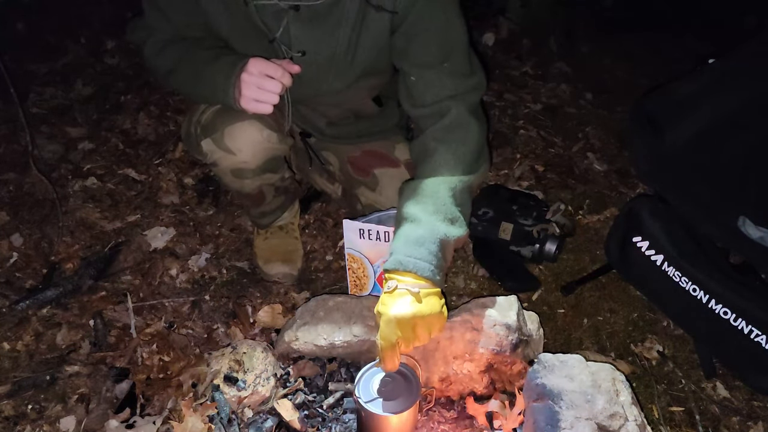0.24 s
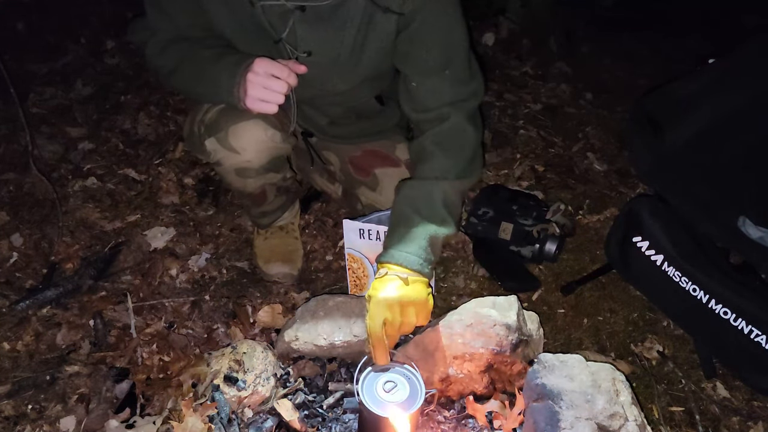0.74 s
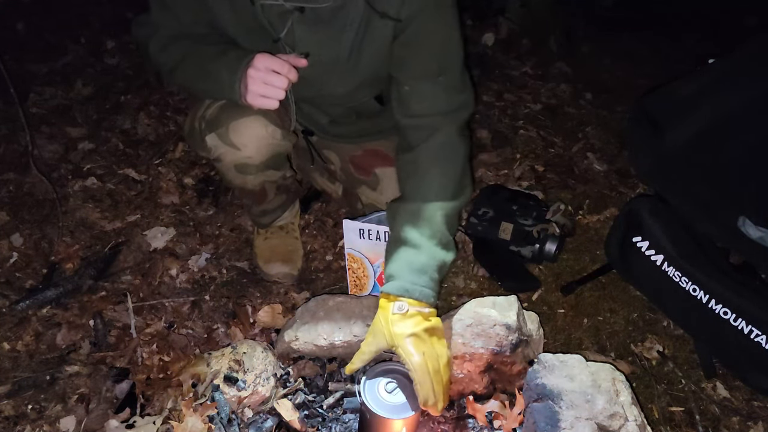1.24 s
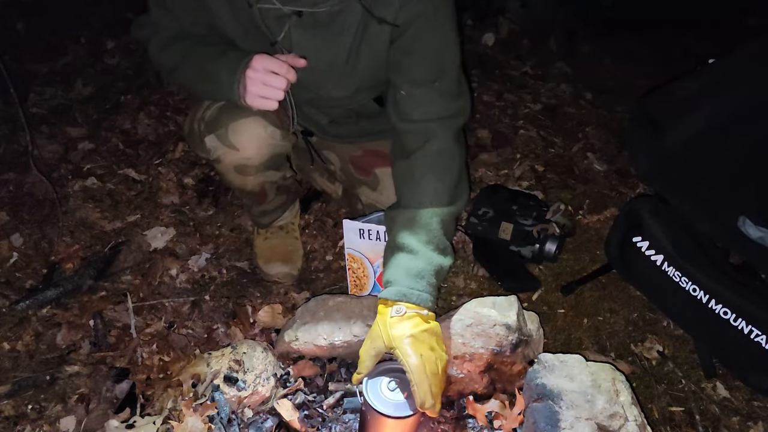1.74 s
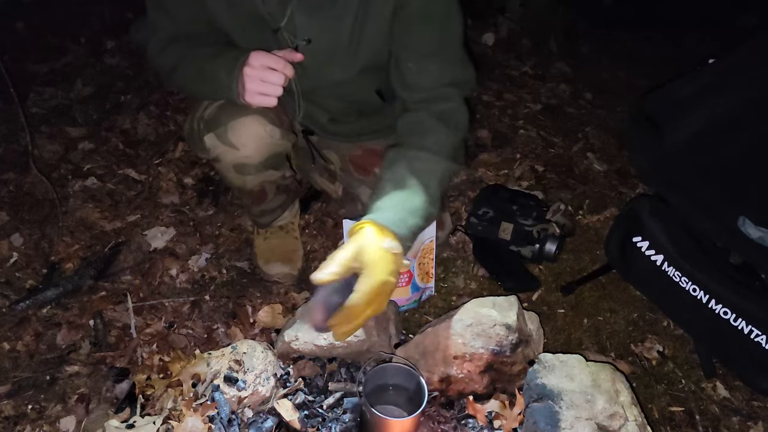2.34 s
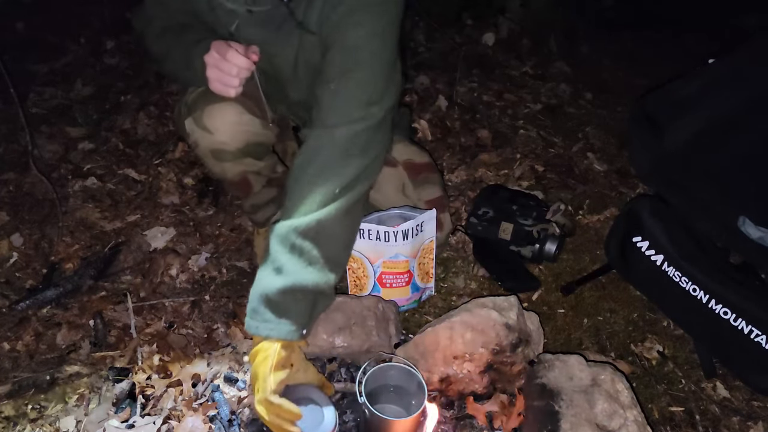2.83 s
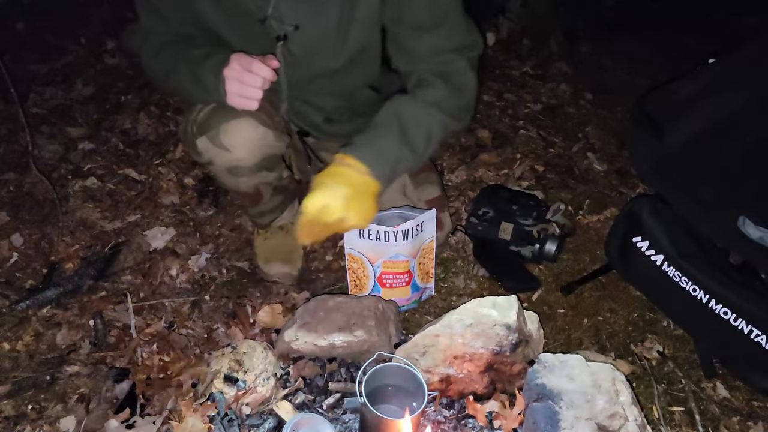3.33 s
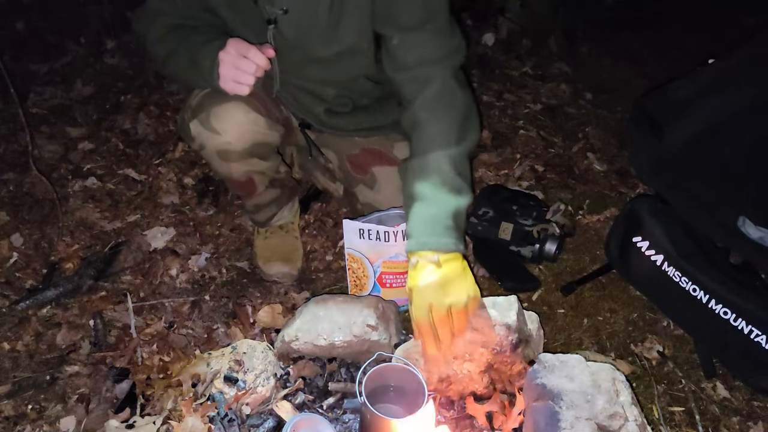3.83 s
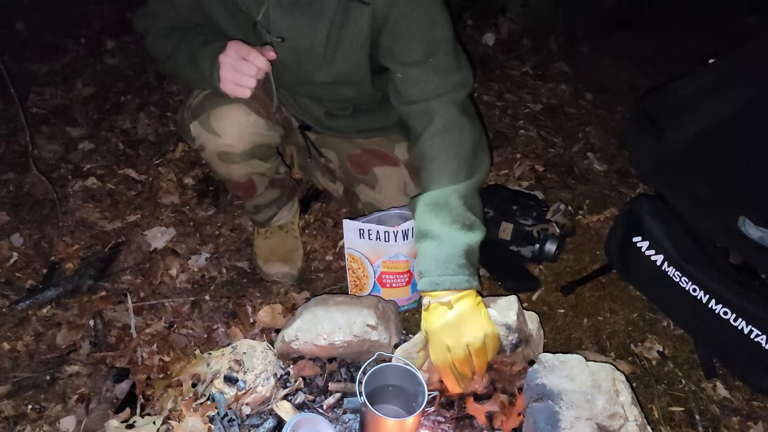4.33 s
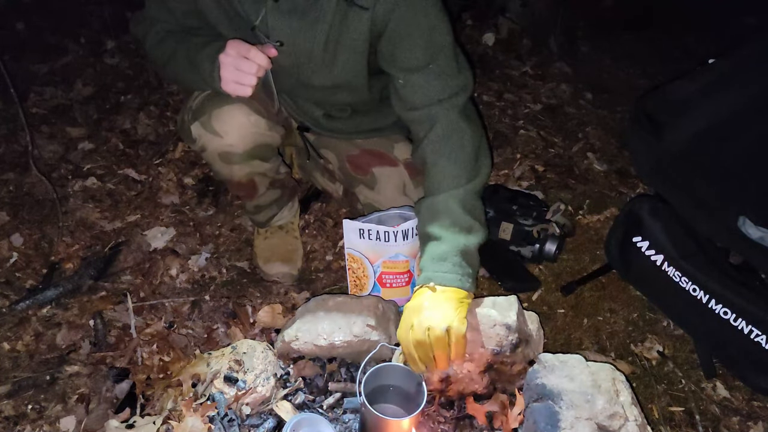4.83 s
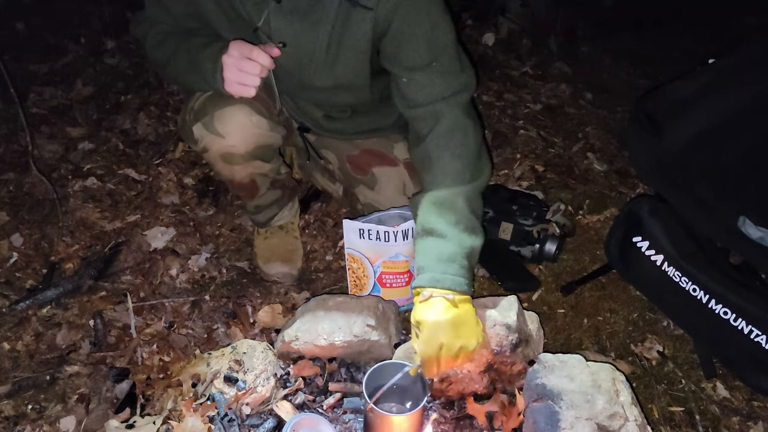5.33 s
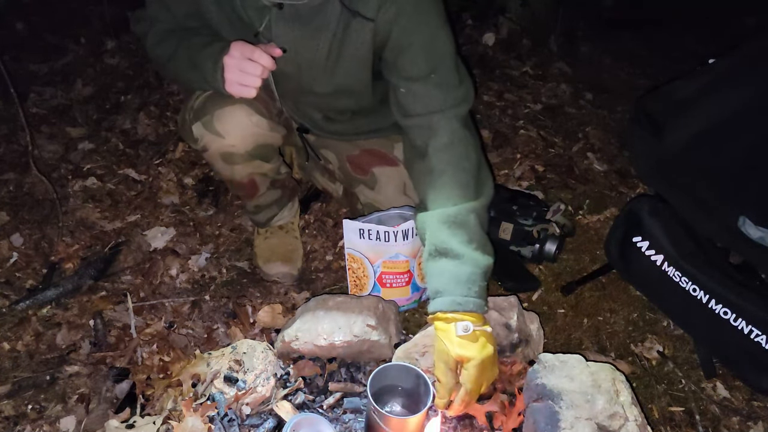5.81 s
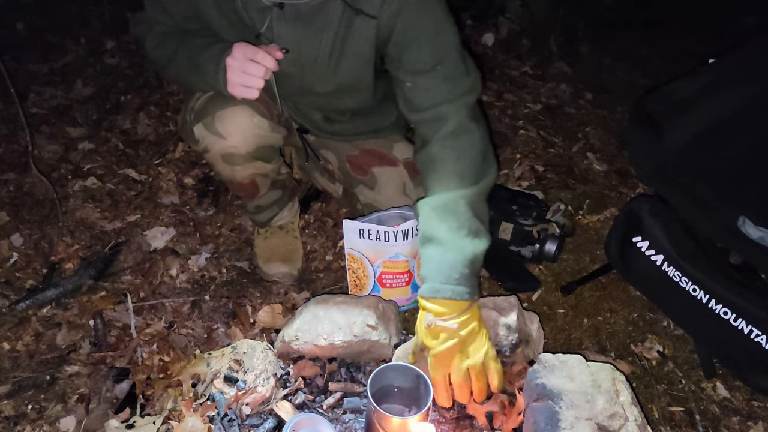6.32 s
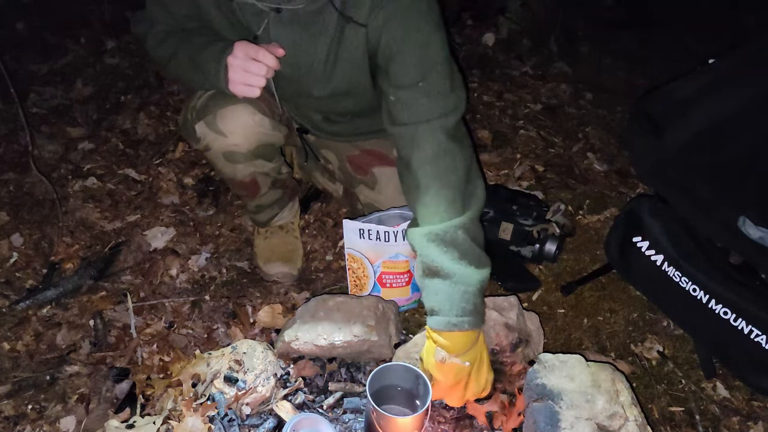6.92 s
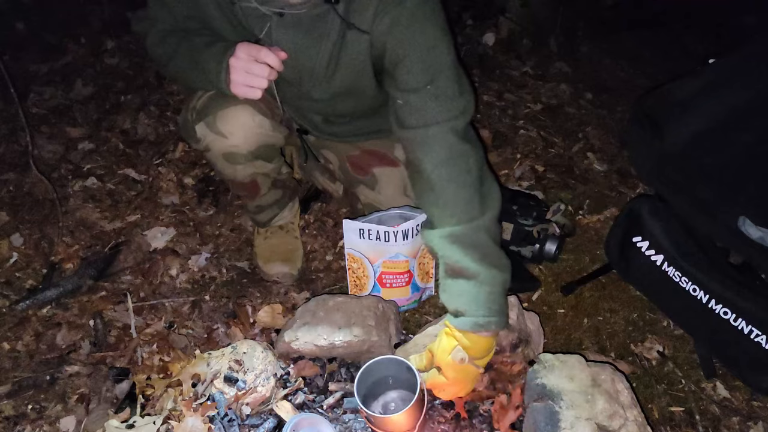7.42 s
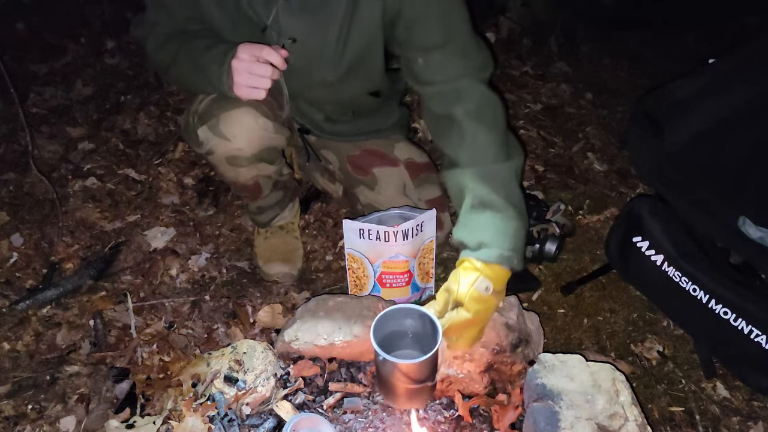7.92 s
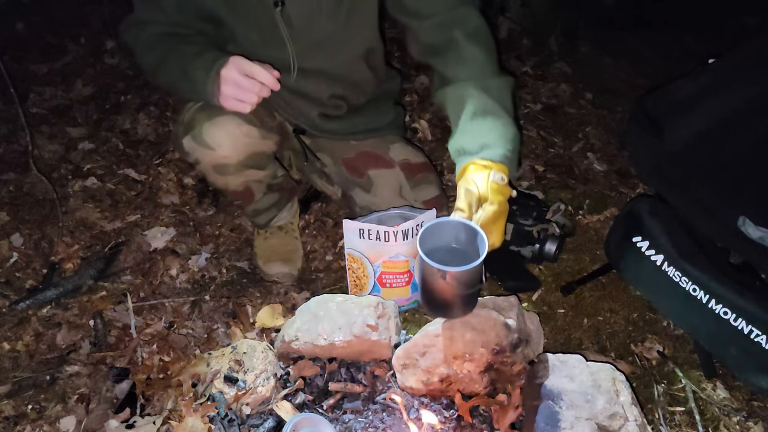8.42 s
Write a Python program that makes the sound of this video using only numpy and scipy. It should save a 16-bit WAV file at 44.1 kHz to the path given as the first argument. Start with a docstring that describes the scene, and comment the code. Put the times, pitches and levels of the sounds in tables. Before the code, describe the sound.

Close metallic knocks and scrapes, a short dry lid rattle on rock, then ringing wire-on-cup clinks beside a quiet, faintly snapping fire outdoors.

```python
"""Tin cup by the embers

A gloved hand works the lid off a thin metal cup at a small campfire and drops it on the stones.
The wire bail grinds in its lugs and clinks on the cup, then the glove lifts the cup away.
Blows drive damped modes, a dense wash and a shimmer; glove and bail rub by random stick and slip.
Embers snap in filtered noise bursts over a low rumble and faint hiss; trees return a noise-tail echo."""
import sys
import numpy as np
from scipy import signal
from scipy.fft import rfft, irfft
from scipy.io import wavfile

SR = 44100
rng = np.random.default_rng(int(sys.argv[2]) if len(sys.argv) > 2 else 0)


def to_wav(s):
    """Save 16-bit WAV."""
    ch = np.atleast_2d(s).T  # columns
    pcm = np.round(np.clip(ch, -1, 1) * 32767)  # PCM
    wavfile.write(sys.argv[1], SR, pcm.astype(np.int16))


N = 381906  # length [samples]
RING_TIME = np.arange(SR // 3) / SR  # the third of a second given to each blow [s]
CRACK_T60_S = .008  # 60 dB decay of the crack at a point of contact


def undb(db):
    """Decibels to gain."""
    return 10 ** (np.asarray(db) / 20)


def unit(x):
    """Scale to an energy of one, averaged over the channels."""
    return x / np.sqrt(np.mean(np.sum(x ** 2, axis=-1)) + 1e-20)


def fade(t60):
    """Exponential decay that falls 60 dB in t60 seconds."""
    return np.exp(-np.log(1000) * RING_TIME / t60)


def colour(x, points):
    """Causal, minimum-phase filter through (frequency [Hz], gain [dB]) points, by the cepstrum."""
    hz, db = np.transpose(points)
    size = 4096
    bin_hz = np.arange(size // 2 + 1) * SR / size
    log_gain = np.log(undb(np.interp(np.log(bin_hz + 1), np.log(hz), db)))
    # folding the cepstrum onto positive time makes the filter causal
    cepstrum = irfft(log_gain)[:size // 2]
    cepstrum[1:] *= 2
    impulse = irfft(np.exp(rfft(cepstrum, size)))
    return signal.fftconvolve(x, impulse[None], axes=-1)[:, :x.shape[-1]]


def stereo_noise(count, split_hz):
    """Noise nearly alike at both ears in the lows, widening until unrelated above split_hz."""
    mid, side = rfft(rng.standard_normal((2, count)))
    hz = np.fft.rfftfreq(count, 1 / SR)
    width = np.clip(hz / split_hz, .2, 1)
    spectra = np.array([mid + width * side, mid - width * side])
    return irfft(spectra / np.sqrt(1 + width ** 2), count)


def add(out, s, sound):
    """Mix a sound in at time s."""
    start = int(s * SR)
    out[:, start:start + sound.shape[1]] += sound[:, :N - start]


def random_slips(count, slips_per_s):
    """Sparse jerks of random size and sign at random instants."""
    return (rng.random(count) < slips_per_s / SR) * rng.standard_normal(count)


def slipping(slips_per_s, rough_db):
    """Stick and slip: tiny jerks of uneven size that come in spurts."""
    slips = random_slips(N, slips_per_s)
    # each 400-sample spurt has its own level
    spurt_db = rough_db * np.repeat(rng.uniform(-1, 1, N // 400 + 1), 400)[:N]
    return slips * undb(spurt_db)


def strokes(table):
    """Each stroke swells to its peak and dies away, by 20 dB over its rise and its fall time."""
    t = np.arange(N) / SR
    power = np.zeros(N)
    for s, db, rise_s, fall_s in table:
        away = np.maximum((s - t) / rise_s, (t - s) / fall_s)
        power += undb(db - 20 * np.minimum(away, 10)) ** 2
    return np.sqrt(power)


def contact(chatter_s, slips_per_s):
    """One sharp touch, then a dying run of tiny rebounds and slips."""
    slips = random_slips(len(RING_TIME), slips_per_s)
    force = 1.8 * unit(slips * np.exp(-2 * RING_TIME / chatter_s))
    force[0] += 1 / (1 + chatter_s / 0.022)  # long chatter softens the first touch
    return force


def ring(force, modes, split_hz):
    """Damped modes; the higher ones reach the two ears out of step."""
    mode_bend = .003  # grip and point of contact bend each pitch by up to this share
    out = 0
    for (hz, db, t60), (phase, skew, share, bend) in zip(modes, rng.uniform(-1, 1, (len(modes), 4))):
        bent_hz = hz * (1 + mode_bend * bend)
        pole = np.exp((2j * np.pi * bent_hz - np.log(1000) / t60) / SR)
        swing = signal.lfilter([1], [1, -pole], force)
        ear_skew = np.array([[1], [-1]]) * skew * min(hz / split_hz, 1.3)
        turn = np.exp(1j * (np.pi * phase + ear_skew))
        # each blow shifts the mode's level by up to 3.6 dB
        out = out + undb(db + 3.6 * share) * unit((turn * swing).imag)
    return unit(out)


def shimmer(t60, thinning):
    """The scattered partials that one contact point happens to wake; they crowd together in the treble."""
    count = len(RING_TIME)
    hz = np.fft.rfftfreq(count, 1 / SR)
    share = np.interp(hz, [2000, 9000], [.07, .14]) / thinning
    awake = (rng.random(len(share)) < share) / np.sqrt(share)
    return irfft(rfft(stereo_noise(count, 5600)) * awake, count) * fade(t60)


def blows(table, modes, wash, wash_t60, slips_per_s, split_hz, ring_db, shimmer_db, glance):
    """Each contact drives the clear modes, the dense, short wash of thin metal and a longer shimmer."""
    out = np.zeros((2, N))
    for s, db, chatter_s, bass_db, treble_db in table:
        free_db = -max(treble_db, 0) * glance  # a bright, glancing touch leaves less ring
        force = contact(chatter_s, slips_per_s)
        plate = unit(stereo_noise(len(force), split_hz) * (fade(wash_t60) + fade(CRACK_T60_S)))
        plate = plate + undb(shimmer_db + free_db) * unit(shimmer(t60=.22, thinning=2.5))
        struck = signal.fftconvolve(plate, force[None], axes=-1)[:, :len(force)]
        clash = unit(colour(struck, wash))
        sound = clash + undb(free_db + ring_db) * ring(force, modes, split_hz)
        # the place and hardness of the contact tip the balance of lows and highs
        sound = colour(sound, [(450, bass_db), (1300, 0.0022), (3000, treble_db / 4), (9000, treble_db)])
        # the first 20 ms set the level in each channel
        attack = np.sqrt(np.mean(sound[:, :SR // 50] ** 2, axis=1, keepdims=True))
        add(out, s, sound / attack * undb(db))
    return out


# rumble level before its trim: (time [s], level [dB])
RUMBLE_LEVEL = [(0.0, -48.5), (2.99, -49), (3.01, -46.5), (6.39, -51), (8.66, -47.5)]
# tone of the rumble: (frequency [Hz], gain [dB])
RUMBLE_COLOUR = [(12, -52.5), (20, -15.5), (80, -1), (113, -10), (178, -13), (198, -20.5), (354, -19.5),
                 (431, -24), (536, -23), (597, -29), (955, -32.5), (1500, -40.5), (1950, -70.5),
                 (3300, -120)]
# tone of the hiss: (frequency [Hz], gain [dB])
HISS_COLOUR = [(1000, -16.5), (2000, -2.5), (3500, -9), (5500, -6.5), (6500, 0), (7300, 10.5),
               (8300, -60.5), (10300, -4), (12000, -10.5), (15500, -2)]


def background():
    """A low outdoor rumble of drifting level under a faint hiss, both filtered noise."""
    rumble_trim_db, hiss_db = -0.5, -65.5
    rumble_db = rumble_trim_db + np.interp(np.arange(N) / SR, *np.transpose(RUMBLE_LEVEL))
    rumble = unit(colour(stereo_noise(N, 1000), RUMBLE_COLOUR + [(3500, -99.0)])) * undb(rumble_db)
    hiss = unit(colour(stereo_noise(N, 5000), HISS_COLOUR)) * undb(hiss_db)
    return (rumble + hiss) * np.sqrt(N)  # from unit energy to unit RMS


def trees(x, echo_db, t60):
    """Trunks and ground scatter back a thin tail that builds up over 14 ms."""
    tail = stereo_noise(len(RING_TIME), 3000) * fade(t60) * np.minimum(RING_TIME / 0.014, 1)
    tail = colour(tail, [(5500, -3.5), (7200, 7.0), (8500, -5.5), (15200, -12.0)])
    return undb(echo_db) * signal.fftconvolve(x, unit(tail), axes=-1)[:, :N]


# ember snaps: (time [s], level [dB], centre frequency [Hz])
EMBER_SNAPS = [(2.706, -54, 4970), (3.338, -54, 7250), (3.473, -56.5, 7070), (3.834, -63.5, 9800),
               (6.815, -63, 9200), (7.3987, -50.5, 10400), (7.433, -57.5, 10000), (7.5, -55.5, 7800),
               (7.73, -58.5, 12500)]


def embers():
    """Tiny dry snaps, each a noise burst with its own pitch."""
    out = np.zeros((2, N))
    for s, db, hz in EMBER_SNAPS:
        snap = stereo_noise(len(RING_TIME), 7000) * (fade(.012) + .1 * fade(.05))
        snap = colour(snap, [(hz / 4, -16), (hz / 1.8, -9), (hz, 0), (hz * 1.3, -10)])
        add(out, s, unit(snap) * np.sqrt(SR / 50) * undb(db))  # energy as of 20 ms at that level
    return out


# strokes of the glove and sleeve: (peak time [s], level [dB], rise [s], fall [s])
GLOVE_STROKES = [(.186, -33.5, 0.02, 0.033), (.348, -57, 0.0099, 0.047), (.44, -45, 0.048, 0.047),
                 (.80, -48, 0.23, 0.087), (1.44, -58.5, 0.038, 0.13), (1.55, -54.5, 0.055, 0.056),
                 (2.535, -57, 0.071, 0.056), (2.615, -55, 0.072, 0.31), (2.71, -59.5, 0.2, 0.95),
                 (3.19, -40.5, 0.17, 0.036), (6.58, -52.5, 0.038, 0.11), (7.10, -51, 0.048, 0.14),
                 (7.19, -54, 0.23, 0.15), (7.38, -59.5, 0.19, 0.36)]
# tone of leather and cloth rubbing: (frequency [Hz], gain [dB])
RUB_COLOUR = [(300, 1), (1200, 4), (1800, 0.5), (3100, 4), (5500, 7.5), (8500, 0), (15500, -7)]


def glove():
    """Leather and cloth rub on each other and on the metal: dense slips, each a short puff of rasp."""
    rasp_s, sleeve_db = .002, -72.5  # decay of one puff; cloth never quite rests
    slips = slipping(slips_per_s=2200, rough_db=3.5)
    power = signal.lfilter([1], [1, -np.exp(-1 / (rasp_s * SR))], slips ** 2)
    rasp = unit(colour(stereo_noise(N, 5000) * np.sqrt(power), RUB_COLOUR))
    return rasp * np.sqrt(N) * (strokes(GLOVE_STROKES) + undb(sleeve_db))


# turns of the wire bail in its lugs: (peak time [s], level [dB], rise [s], fall [s])
BAIL_TURNS = [(4.895, -50, 0.03, 0.097), (5.13, -47.5, 0.086, 0.13), (5.27, -29.5, 0.041, 0.1),
              (5.50, -51.5, .1, 0.24), (5.79, -38, 0.14, 0.072), (5.955, -39, .06, 0.15),
              (6.115, -43, 0.096, 0.056), (6.57, -56.5, 0.025, 0.11), (6.83, -56, .08, 0.053),
              (7.35, -50, 0.25, 0.15)]
# tone of the cup's wall as the wire grinds on it: (frequency [Hz], gain [dB])
GRIND_COLOUR = [(400, -21.5), (1050, -7.5), (2450, -6), (3300, -6.5), (5550, 0.5), (6200, -1.5),
                (7200, 8.5), (8400, -3.5), (13000, -6), (15200, 1)]
# ring of the open cup, for grinding and clinks: (frequency [Hz], level [dB], 60 dB decay [s])
CUP_MODES = [(975, -12, .2), (1055, -7, .16), (1330, -6, .22), (1750, -9, .12), (2272, 1, .15),
             (2640, -4, .11), (3860, -8, .12), (4165, -5, .13), (4628, -2, .11), (5040, -7, .15),
             (5480, -4, .14), (5650, 0, .11), (5880, -1, .13), (6207, -3, .09), (6410, -2, .12),
             (8538, -8, .07), (9082, -3, .08), (14293, -2, .07), (14750, 1, .07), (15596, -1, .07)]


def bail_grinding(count=4):
    """The wire catches and slips in its lugs and rings the cup's wall, differently at each point of contact."""
    slips = slipping(slips_per_s=600, rough_db=6)
    dwell = int(.03 * SR)  # 30 ms before the point of contact is drawn again
    place = np.repeat(rng.integers(count, size=N // dwell + 1), dwell)[:N]
    touch = signal.unit_impulse(len(RING_TIME))
    low_modes = [mode for mode in CUP_MODES if mode[0] < 6000]
    out = 0
    for k in range(count):
        grit = .7 * unit(stereo_noise(len(touch), 5000) * fade(CRACK_T60_S))
        wall = unit(shimmer(t60=.11, thinning=6)) + .5 * ring(touch, low_modes, 4000)
        local_slips = slips * (place == k)
        out = out + signal.oaconvolve(local_slips[None], grit + wall, axes=-1)[:, :N]
    return unit(colour(out, GRIND_COLOUR)) * np.sqrt(N) * strokes(BAIL_TURNS)


# clinks of the wire: (time [s], level [dB], chatter [s], bass [dB], treble [dB])
BAIL_CLINKS = [(4.7574, -53.5, .006, -17, -7.5), (4.9141, -43.5, 0.023, 33.5, 5),
               (5.1351, -45, 0.035, -45, 10), (5.2455, -15, 0.0077, 9.5, 14.5),
               (5.2897, -28, 0.016, -39, 6.5), (5.674, -24.5, 0.013, 3, 5.5),
               (5.7152, -27.5, 0.046, 10, 7.5), (5.7397, -27, 0.029, 13, 9.5),
               (5.9662, -11, 0.0074, 18.5, 10), (6.008, -31.5, 0.031, -15, 5),
               (6.066, -43.5, 0.059, 12, 1.5), (6.6007, -29, 0.005, 5, 15.5),
               (6.6915, -49.5, 0.0044, -23.5, -4.5), (7.0801, -45.5, 0.016, -1, 10),
               (7.1516, -50, 0.0067, -4, 15), (7.1699, -39.5, 0.05, -6, 13), (7.206, -46, 0.025, -4, 10),
               (7.235, -51, 0.005, -6, 18), (7.3051, -49, 0.012, -4.5, 10), (8.3522, -47.5, 0.012, 21, 0.5)]
# the cup's crowd of short, close modes: (frequency [Hz], gain [dB])
CUP_WASH = [(300, -31.5), (600, -15), (830, -14), (1300, -6.5), (1950, -4), (2500, 3.5), (3200, -3.5),
            (4300, 3.5), (5700, 2.5), (7100, 3.5), (8100, -4.5), (11000, -4), (15000, -3)]


def bail_on_cup():
    """The flicked wire strikes the open cup, whose thin wall rings freely."""
    return blows(BAIL_CLINKS, CUP_MODES, CUP_WASH, wash_t60=.055, slips_per_s=1300,
                 split_hz=4000, ring_db=-2.5, shimmer_db=-10, glance=.3)


# knocks of the dropped lid: (time [s], level [dB], chatter [s], bass [dB], treble [dB])
STONE_KNOCKS = [(2.4385, -55.5, 0.039, -1, -10), (2.7922, -49, 0.031, -10.5, -24.5),
                (2.9852, -41, 0.16, 0, 13.5), (3.0253, -20.5, 0.017, -5, -1),
                (3.0475, -27.5, 0.0031, -1, -22.5), (3.0506, -21, 0.0037, -14.5, -8.5),
                (3.062, -36.5, 0.05, -2, 3), (3.094, -33, 0.041, 2.5, 17.5),
                (3.113, -26.5, 0.0025, 4, 13.5), (3.119, -26.5, 0.015, 5, 12),
                (3.1745, -24.5, 0.0083, 3.5, -2.5)]
# ring of the loose lid: (frequency [Hz], level [dB], 60 dB decay [s])
LID_MODES = [(140, -10, .1), (1366, -6, .04), (1911, -11, .07), (2270, -17, .33), (3079, -6, .04),
             (3480, -5, .04), (4070, 6, .05), (5114, -8, .11), (6140, -6, .055), (8565, -9, .08),
             (11480, -5, .046)]
# the lid's crowd of short, close modes: (frequency [Hz], gain [dB])
LID_WASH = [(100, -8.5), (350, 0.5), (620, -11.5), (1300, -1), (2000, 0), (3700, 4.5), (5200, -2),
            (8000, -9), (12000, -5), (15500, -8.5)]


def lid_on_stone():
    """The lid lands and rattles on the stones: mostly short modes and a dry wash."""
    return blows(STONE_KNOCKS, LID_MODES, LID_WASH, wash_t60=.022, slips_per_s=2500,
                 split_hz=3500, ring_db=-2, shimmer_db=-20, glance=.9)


# knocks of lid against cup: (time [s], level [dB], chatter [s], bass [dB], treble [dB])
LID_KNOCKS = [(.193, -19, 0.016, 5, 5.5), (.212, -23.5, 0.026, 0, 9.5), (.229, -25.5, 0.028, -6, 9),
              (.638, -29, 0.04, 1, 15.5), (.668, -24.5, 0.027, 5, 21.5), (.691, -27, 0.009, 1.5, 5),
              (.779, -48, 0.079, 11, 6), (.832, -39, 0.033, -0.5, 0), (.858, -41, 0.054, 11.5, 13),
              (1.4447, -41.5, 0.027, 9, 13.5), (1.4861, -42.5, 0.025, 4, 3.5),
              (1.5265, -42.5, 0.0026, -1, -8), (2.158, -51, 0.0095, 20, -33), (3.341, -49.5, 0.02, 20, -6),
              (3.385, -49, 0.069, 24, -33), (3.446, -47, 0.013, 23, -16)]
# ring of cup and lid together: (frequency [Hz], level [dB], 60 dB decay [s])
CLOSED_MODES = [(299, 11, .09), (362, 7, .15), (1421, -4, .09), (1739, 1, .12), (2234, -6, .13),
                (3343, -9, .14), (4021, -7, .14), (4600, -4, .1), (5010, 5, .11), (5720, -4, .08),
                (6352, -8, .15), (7100, -7, .1), (10300, -9, .12)]
# the closed cup's crowd of short, close modes: (frequency [Hz], gain [dB])
CLOSED_WASH = [(100, -10.5), (200, -24), (310, 12), (450, -0.5), (600, -14.5), (800, -11), (1250, 4),
               (2200, 2), (4000, 3.5), (7000, -3), (8300, -9.5), (10400, -9), (12200, -13), (15000, -11.5)]


def lid_on_cup():
    """The lid knocks and scrapes against the cup, and both ring as one closed body."""
    return blows(LID_KNOCKS, CLOSED_MODES, CLOSED_WASH, wash_t60=.035, slips_per_s=2000,
                 split_hz=8000, ring_db=-1, shimmer_db=-13, glance=.5)


def scene():
    """Lid, bail and glove among the trees, beside the fire."""
    lid = lid_on_cup() + lid_on_stone()
    bail = bail_on_cup()
    echo = trees(bail + undb(-2) * lid, echo_db=-35.5, t60=0.88)
    return background() + echo + embers() + glove() + bail_grinding() + bail + lid


# treble tilt of the two microphone ports: (frequency [Hz], gain added left and taken from right [dB])
PORTS = [(2200, 0), (3900, -1.5), (5500, .1), (8000, .4), (11500, 1.5), (14500, 0)]


def record(dry):
    """Each port colours its channel; a steep elliptic low-pass cuts the top."""
    top_hz = 15950
    left = colour(dry[:1], PORTS)
    right = colour(dry[1:], [(hz, -db) for hz, db in PORTS])
    low_pass = signal.ellip(10, .2, 70, top_hz, fs=SR, output="sos")
    return signal.sosfilt(low_pass, np.vstack([left, right]))


dry = scene()
out = record(dry)
to_wav(out)
```